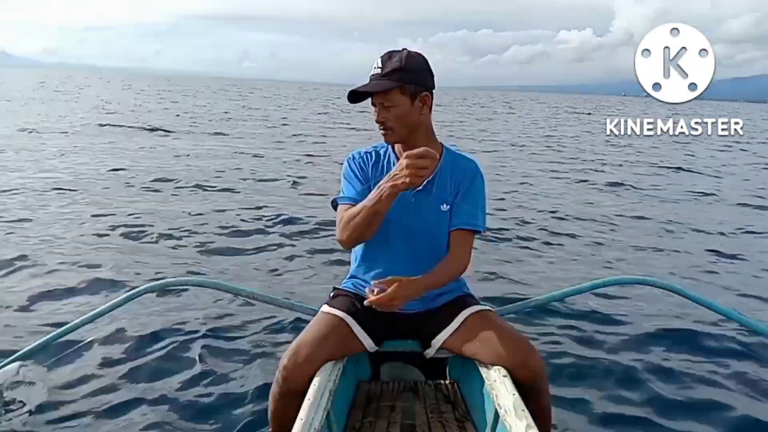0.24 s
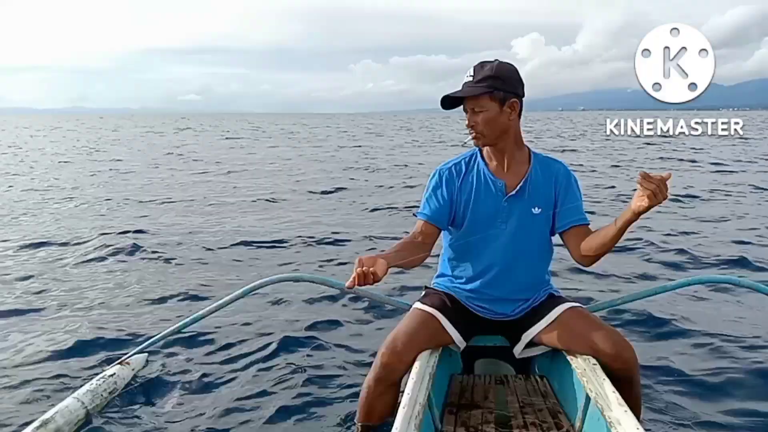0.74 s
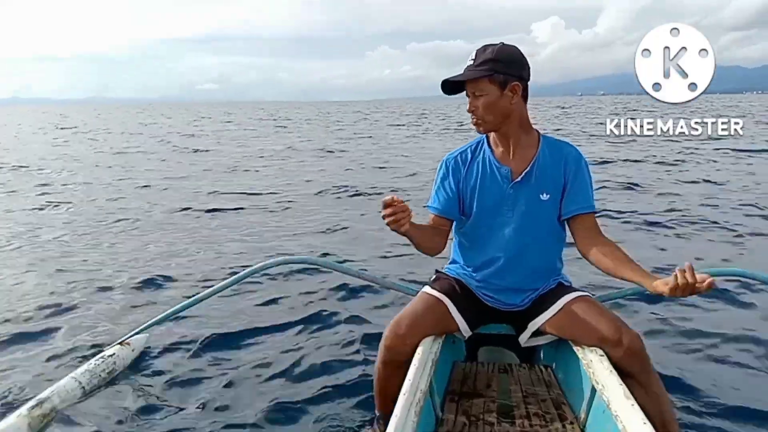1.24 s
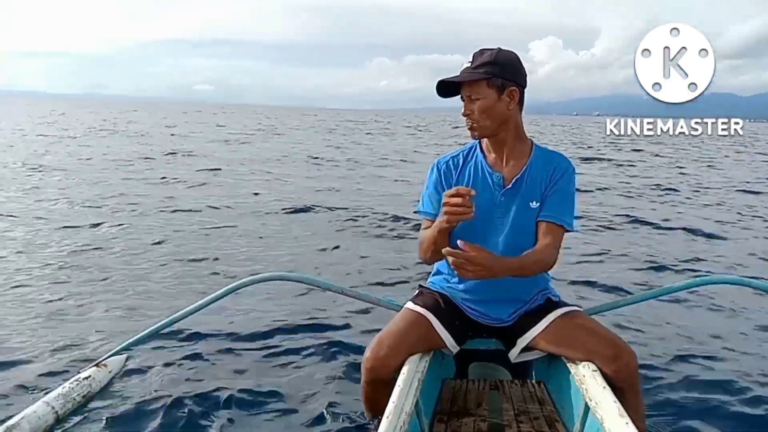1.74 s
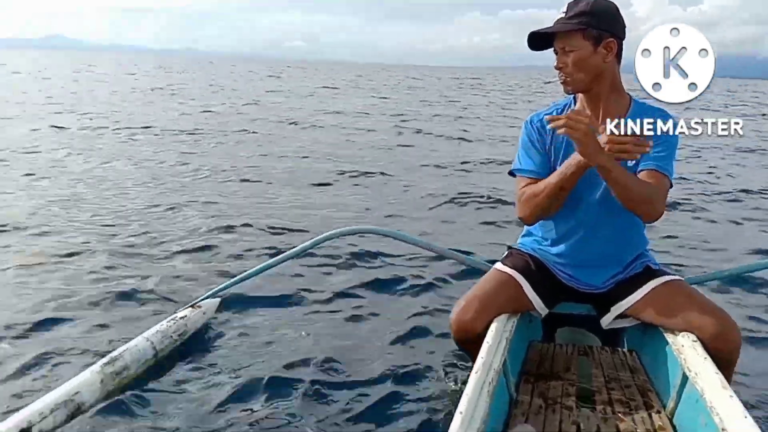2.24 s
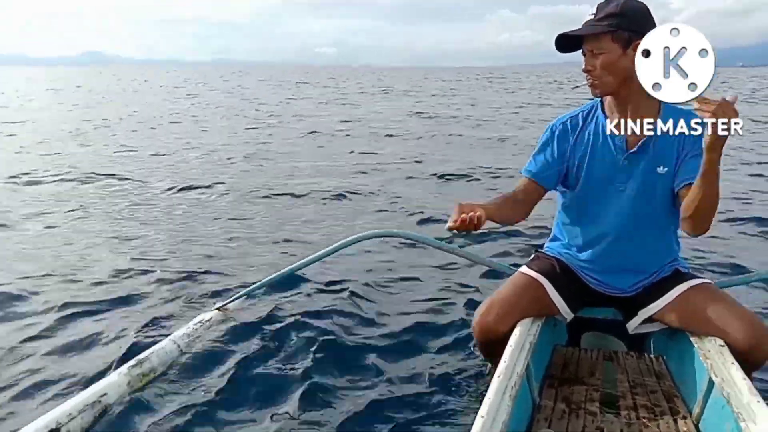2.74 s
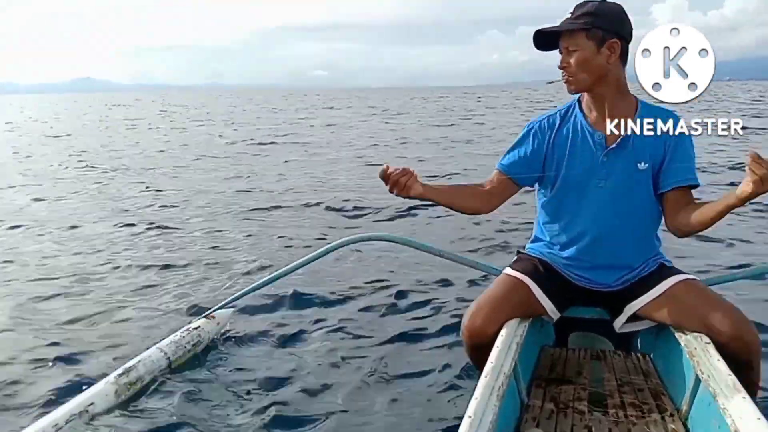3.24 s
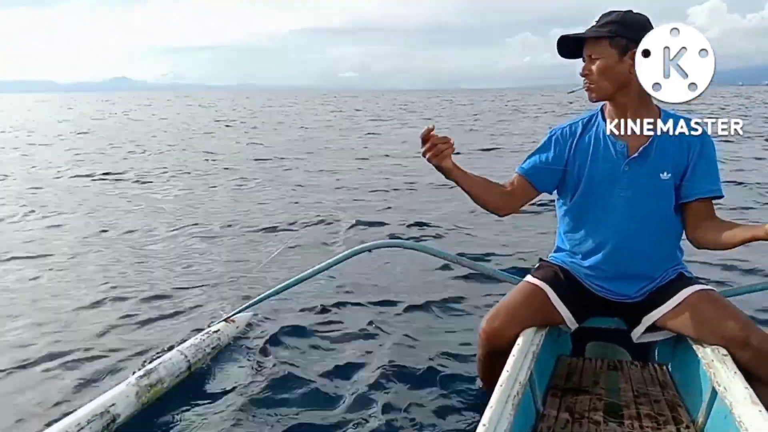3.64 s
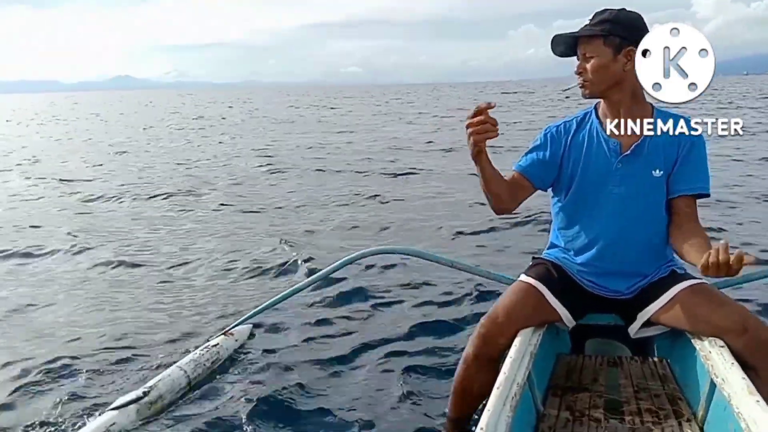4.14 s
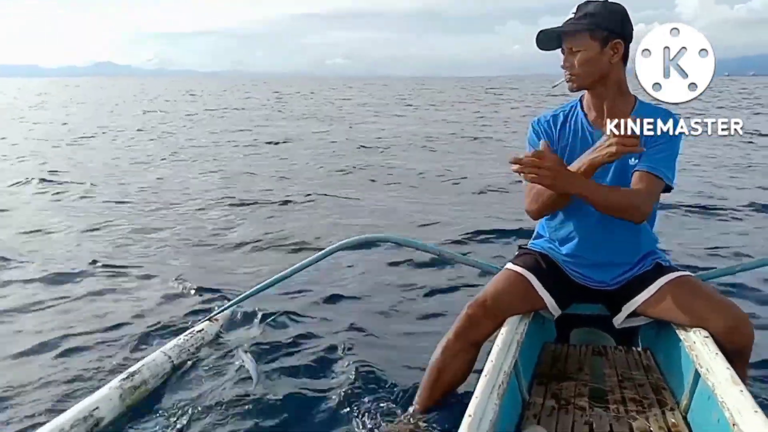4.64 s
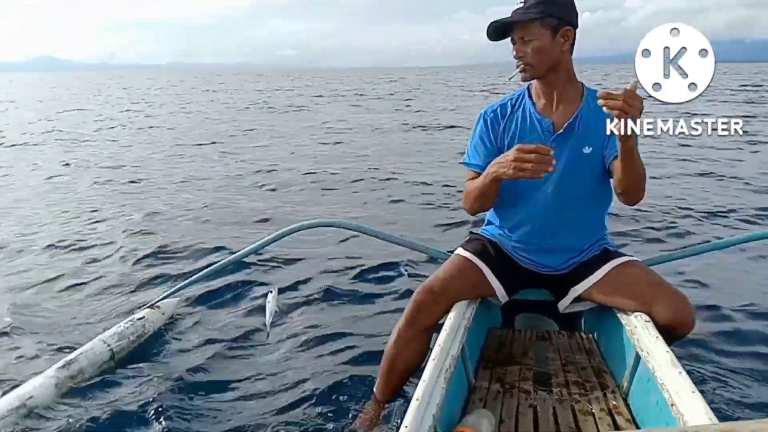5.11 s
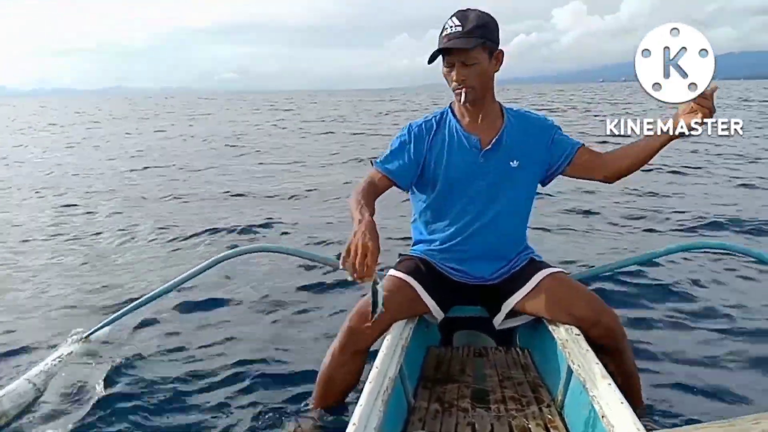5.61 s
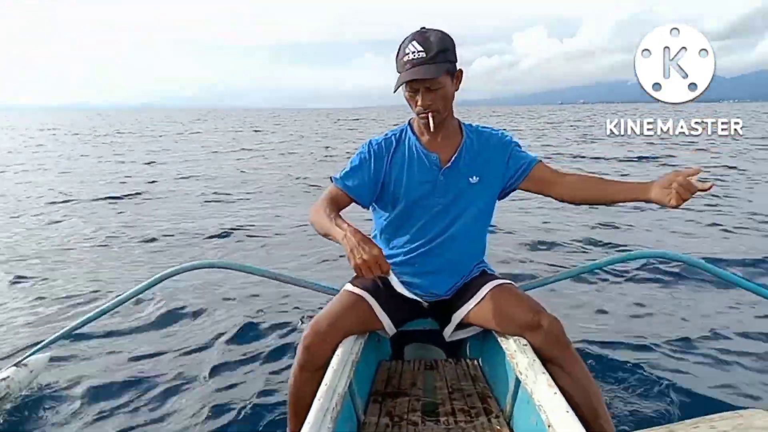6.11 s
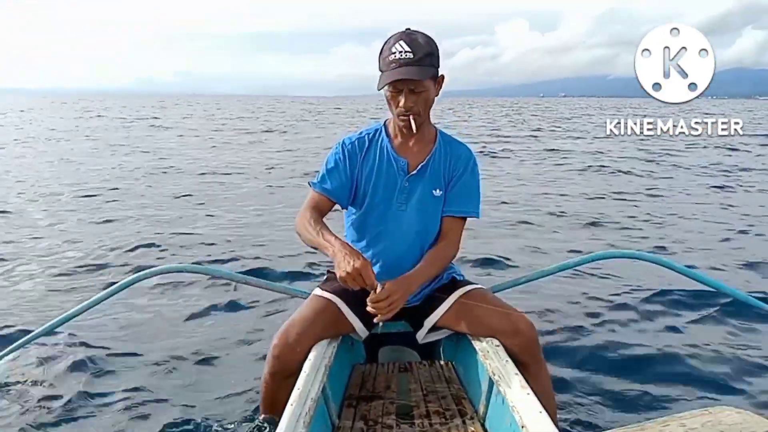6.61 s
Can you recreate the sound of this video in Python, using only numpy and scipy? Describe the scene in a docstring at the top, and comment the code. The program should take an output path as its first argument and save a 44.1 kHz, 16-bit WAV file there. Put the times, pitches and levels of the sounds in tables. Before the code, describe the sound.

Close to the water on a small wooden boat in open sea, sparse drips and faint lapping come first. A sharp little slap lands after one second, then gulping bubbles and slaps after two. Drops tick on through a calmer middle; gurgling returns around four and a half seconds, and the loudest slap and fizzing splash come after six. Low wind buffets the microphone over faint hiss.

```python
"""Small waves lap against the hull and float of a wooden boat at sea: slaps of shaped noise and a watery gurgle.
Trapped air gulps and rings as bubbles, each a short sine gliding in pitch.
Drops tick and ring; spray fizzes from crowds of tiny bubbles and crackling noise as each wave breaks.
Behind them, low lumpy noise is wind rumbling on the microphone, over a faint steady background hiss."""
import sys
import numpy as np
from scipy import signal
from scipy.fft import rfft, irfft
from scipy.io import wavfile

SR = 44100
rng = np.random.default_rng(int(sys.argv[2]) if len(sys.argv) > 2 else 0)


def log_audio(samples):
    """Write samples as a 16-bit WAV file to the path given in sys.argv[1]."""
    # one column per channel
    frames = np.atleast_2d(samples).T
    # limit to full scale, then quantise
    limited = np.clip(frames, -1, 1)
    pcm = np.round(limited * 32767).astype(np.int16)
    wavfile.write(sys.argv[1], SR, pcm)


N = 302526   # length in samples


def from_db(db):
    """Turn a level in dB into a gain."""
    return 10 ** (np.asarray(db) / 20)


def rms_one(x):
    """Scale a sound to an average strength (rms) of 1."""
    return x / np.sqrt(np.mean(x ** 2) + 1e-20)


def band(x, order, hz, kind="low"):
    """Filter a sound to the part below, above or between the given frequencies."""
    return signal.sosfilt(signal.butter(order, hz, kind, fs=SR, output="sos"), x)


def drift(rate_hz):
    """Slow random wandering: noise through two equal one-pole low-passes; rms 1."""
    r = np.exp(-2 * np.pi * rate_hz / SR)
    noise = rng.standard_normal(N + SR)
    # the first second lets the filter settle
    return rms_one(signal.lfilter([1], [1, -2 * r, r * r], noise)[SR:])


def colour(x, spectrum):
    """Shape flat sound by a (Hz, dB) curve, minimum phase so that nothing sounds early; rms 1."""
    size = 8192
    hz = np.maximum(np.fft.rfftfreq(size, 1 / SR), 1)
    points = np.array(spectrum)
    curve_db = np.interp(np.log(hz), np.log(points[:, 0]), points[:, 1])
    # folding the cepstrum onto positive times gives minimum phase
    cepstrum = irfft(np.log(from_db(curve_db)))
    cepstrum[1:size // 2] *= 2
    cepstrum[size // 2 + 1:] = 0
    response = irfft(np.exp(rfft(cepstrum)))
    return rms_one(signal.fftconvolve(x, response)[:N])


def in_time(rows):
    """Join the rows of a table with straight lines, giving each column at every sample."""
    s, *columns = np.transpose(rows)
    return [np.interp(np.arange(N) / SR, s, column) for column in columns]


def with_swells(base_db, times, peaks_db, rises_ms, falls_ms):
    """A level in dB with swells added in power; each climbs and falls 20 dB in its rise and fall time."""
    power = from_db(2 * (base_db + np.zeros(N)))
    for s, peak_db, rise_ms, fall_ms in zip(times, peaks_db, rises_ms, falls_ms):
        late_ms = 1000 * (np.arange(N) / SR - s)
        swell_db = peak_db - 20 * np.maximum(-late_ms / rise_ms, late_ms / fall_ms)
        power = power + from_db(2 * swell_db)
    return 10 * np.log10(power)


def bursts(times, peaks_db, decays_ms, rise_ms):
    """Envelope of sudden bursts that die away exponentially."""
    out = np.zeros(N + SR)
    for s, peak_db, decay_ms in zip(times, peaks_db, decays_ms):
        age_ms = np.arange(int(6 * decay_ms * SR / 1000)) * 1000 / SR
        at = int(s * SR)
        shape = np.exp(-age_ms / decay_ms) * (1 - np.exp(-age_ms / rise_ms))
        out[at:at + len(age_ms)] += from_db(peak_db) * shape
    return out[:N]


def bubbles(rows, rise, wobble_db, waver, sag=1.6):
    """Each bubble starts fast, rings as a gliding sine, sags and pinches off; level and pitch are unsteady."""
    out = np.zeros(N + SR)
    unsteady = 2 ** (waver * np.resize(drift(45.5), N + SR))   # waver is in octaves
    for s, start_hz, end_hz, level_db, glide_ms in rows:
        at = int(s * SR)
        # the sine lasts 1.3 times the glide time, gliding on past the end pitch
        length = 1.3 * glide_ms * SR / 1000
        age = np.arange(int(length)) / length   # 0 at birth, 1 at the end
        hz = start_hz * (end_hz / start_hz) ** (1.3 * age) * unsteady[at:at + len(age)]
        shape = (1 - np.exp(-age / rise)) * np.exp(-sag * age) * (1 - age ** 3)
        out[at:at + len(age)] += from_db(level_db) * shape * np.sin(2 * np.pi * np.cumsum(hz) / SR)
    return out[:N] * from_db(wobble_db * drift(126))


def crowd(per_s, low_hz, octaves, cycles, spread_db, bunch_db):
    """Small bubbles born at random, louder in bunches, each ringing some cycles and gliding a little; rms 1."""
    born, pitch, glide, size, ringing = rng.random((int(per_s * N / SR), 5)).T
    hz = low_hz * 2 ** (octaves * pitch)
    end_hz = hz * 2 ** (.17 * glide - .06)
    bunches_db = bunch_db * drift(14)[(born * N).astype(int)]
    level_db = -spread_db * np.log(size + 0.025) + bunches_db   # few are much louder than the rest
    glide_ms = 1000 * cycles * (0.76 + ringing) / hz
    rows = np.transpose([born * N / SR, hz, end_hz, level_db, glide_ms])
    return rms_one(bubbles(rows, rise=0.04, wobble_db=2.0, waver=0.012, sag=2.2))


def crackle(per_s, clump_db, mist_db):
    """The tiniest bubbles burst in clumps as short ticks of uneven size, over a mist of noise; rms 1."""
    clump = drift(29)
    born = rng.random(N) < per_s * from_db(clump_db * clump) / SR
    ticks = born * from_db(5.0 * np.minimum(rng.exponential(1, N), 3.0))
    # each tick becomes a very short decaying burst of noise
    ticks = signal.lfilter([1], [1, -.95], ticks) * rng.standard_normal(N)
    mist = from_db(mist_db + clump_db * clump) * rng.standard_normal(N)
    return rms_one(rms_one(ticks) + mist)


def hiss():
    """A faint steady background hiss: noise shaped by a curve."""
    # Tone of the background hiss. Each row: frequency in Hz, relative strength in dB.
    hiss_curve = [(150, -40), (250, -6.5), (3530, -7), (5260, -25.5), (7950, -12.5), (9700, -26),
                  (12600, -34), (21300, -120)]
    return from_db(-73) * colour(rng.standard_normal(N), hiss_curve)


def wind():
    """Eddies buffet the microphone port: lumpy low noise that swells in gusts, its deepest part cut."""
    # Gusts. Each row: peak time in seconds, level added at the peak in dB, time to climb 20 dB in ms.
    gust_rows = [(0.12, -55, 67), (0.62, -57.5, 130), (1.2, -50.5, 140), (1.409, -40.5, 78),
                 (2.31, -46, 60), (2.569, -40.5, 43), (2.66, -46.5, 56), (3.97, -42.5, 153),
                 (4.36, -49, 160), (4.48, -43.5, 49), (4.8, -50.5, 220), (5.84, -44.5, 200),
                 (6.0, -46.5, 240), (6.27, -41, 190), (6.43, -35, 123), (6.69, -36.5, 92)]
    # Tone of the rumble before the cut. Each row: frequency in Hz, relative strength in dB.
    wind_curve = [(12, -53), (45, -1.5), (100, 2), (150, -1.5), (220, -7.5), (300, -14.5), (390, -30),
                  (660, -120)]
    lull_db, fade_ratio = -64.5, 1.12   # level between gusts; fade time against build-up
    s, peak_db, build_ms = np.transpose(gust_rows)
    wind_db = with_swells(lull_db, s, peak_db, build_ms, fade_ratio * build_ms)
    eddies = colour(rng.standard_normal(N) * from_db(2.2 * drift(9)), wind_curve)
    return from_db(wind_db) * band(eddies, 4, 58., "high")


def spray(spray_db, fizz_db):
    """Plinks and some crackle in the middle range, patchy while faint; finer fizz above, uneven throughout."""
    # Tone of the spray before it is split in two. Each row: frequency in Hz, relative strength in dB.
    spray_curve = [(530, -11), (900, -5.5), (1110, -2), (1540, -5), (1960, 2), (2230, -4.5), (3100, -2),
                   (3900, -2), (4980, -13.5), (8270, -9), (9700, -23.5), (12600, -43), (21300, -120)]
    # Splashes that build up and break off. Each row: peak time in seconds, spray level added at the
    # peak in dB, fizz level against the spray in dB, time to climb 20 dB in ms.
    splash_rows = [(0.213, -41.5, -8.5, 33), (1.195, -47.5, -7.5, 190), (1.62, -79.5, 22, 95),
                   (2.311, -54, 6, 53), (2.659, -54.5, 1.5, 14), (3.684, -46, -9, 26),
                   (4.689, -43.5, -7, 58), (5.946, -41, -4.5, 81), (6.14, -43.5, -6.5, 41),
                   (6.364, -35, -1.5, 26)]
    s, peak_db, brighter_db, build_ms = np.transpose(splash_rows)
    break_ms = np.full(len(s), 32)   # time to fall 20 dB
    spray_db = with_swells(spray_db, s, peak_db, build_ms, break_ms)
    fizz_db = with_swells(fizz_db, s, peak_db + brighter_db, build_ms, break_ms)

    plinks = crowd(per_s=850., low_hz=800., octaves=2.6, cycles=25., spread_db=2.9, bunch_db=2.0)
    plinks = rms_one(np.gradient(plinks))   # small bubbles radiate better
    fine = crackle(per_s=240.0, clump_db=3.5, mist_db=-1.5)
    pricks = crowd(per_s=200., low_hz=4800., octaves=1.1, cycles=14., spread_db=3.8, bunch_db=3.)

    # the middle is uneven while faint, evening out into a steady rush towards -40.5 dB
    faint = np.clip((-40.5 - spray_db) / 20, 0, 1)
    patches_db = 4.0 * faint * drift(5.5)
    rush = (1 - faint) ** 2   # share of plain rushing noise in the middle range
    grains = rms_one(plinks + from_db(-3.0) * fine)
    wash = (grains + rush * rng.standard_normal(N)) / np.sqrt(1 + rush ** 2)
    middle = rms_one(band(colour(wash, spray_curve), 4, 4700))

    fizz = rms_one(band(colour(from_db(-4.5) * pricks + fine, spray_curve), 4, 4700, "high"))
    lower = signal.sosfiltfilt(signal.butter(2, 6800, fs=SR, output="sos"), fizz)
    # the lower and upper fizz come and go separately
    fizz = sum(from_db(4.0 * drift(11.3)) * part for part in (lower, fizz - lower))
    return from_db(spray_db + patches_db) * middle + from_db(fizz_db) * fizz


def drops():
    """A drop hits water or wood: a sharp bright tick, and a body with a brief ring and a ping an octave up."""
    # Drops. Each row: start in seconds, treble level in dB before the mix, body level against treble in dB.
    drop_rows = [(0.0846, -30, -5), (0.636, -38, -10), (0.8397, -35.5, 6), (1.1778, -36.5, 4),
                 (1.8296, -31, -25), (1.886, -45, 9), (2.0351, -51, 22), (2.065, -46.5, 21.5),
                 (2.078, -30, -3), (2.261, -32, -5), (2.291, -36, 4), (2.123, -45.5, 16.5),
                 (2.7303, -33.5, 5.5), (2.781, -38, 5), (2.8242, -28, -16), (2.911, -41, 18),
                 (3.06, -46, 17.5), (3.243, -36, -12), (3.3335, -30.5, 3.5), (3.4276, -29, -23),
                 (3.6345, -40, -23), (3.734, -53, 0), (3.835, -38, -4), (3.892, -37, 0.5),
                 (3.93, -35.5, -10), (4.2064, -42, 12), (4.4039, -43.5, 21.5), (4.675, -26, 2),
                 (4.8462, -29, -1), (4.9, -34, 10), (5.0603, -26.5, -29), (5.316, -25.5, -12),
                 (5.3462, -26.5, 6.5), (5.399, -24.5, -2), (5.4643, -32.5, 13), (5.526, -50, 31),
                 (5.5672, -34, 18), (5.8292, -30, 2), (5.877, -40.5, 17.5), (5.9138, -47, 22.5),
                 (6.298, -33, -5), (6.354, -20.5, 10), (6.375, -19, 6), (6.4798, -28.5, 13),
                 (6.489, -29, 13), (6.586, -24, -4), (6.725, -19, -10), (6.739, -25, -15), (6.775, -21, -9),
                 (6.6492, -16, -12), (6.7616, -13, -14), (6.824, -24, -4)]
    # Lowest and highest pitch a drop's ring may have, in Hz, before it wavers.
    ring_range = (3260, 4216)
    s, peak_db, body_db = np.transpose(drop_rows)
    each = np.ones(len(s))
    hz = rng.uniform(*ring_range, len(s))
    ring_ms = 2.83 * each
    ring_rows = np.transpose([s, hz, hz, peak_db + body_db, ring_ms])
    ring = bubbles(ring_rows, rise=0.31, wobble_db=2.0, waver=0.025)
    ping_rows = np.transpose([s, 2 * hz, 2 * hz, peak_db, ring_ms])
    ping = bubbles(ping_rows, rise=.1, wobble_db=4.0, waver=.06)
    treble = bursts(s, peak_db, 3.14 * each, rise_ms=.3) * rng.standard_normal(N)
    body = bursts(s, peak_db + body_db, 5.6 * each, rise_ms=0.43) * rng.standard_normal(N)
    bright = band(treble, 5, [5200, 8700], "band")
    splat = band(body, 2, [2800, 4500], "band")
    return from_db(-10.0) * ping + from_db(-4.5) * bright + from_db(-6.0) * splat + from_db(-1.0) * ring


def clear_bubbles():
    """Trapped air gulps and rings as single clear bubbles, each a gliding sine."""
    # Bubbles and gulps, before their wavering. Each row: start in seconds, start pitch in Hz,
    # end pitch in Hz, level in dB before the fade shape, time to reach the end pitch in ms.
    bubble_rows = [(0.158, 900, 770, -47, 16), (0.189, 2600, 2610, -21.5, 3.5), (0.425, 620, 706, -51, 40),
                   (0.731, 476, 503, -42.5, 37), (1.062, 1210, 1290, -44, 10),
                   (1.174, 743, 550, -37.5, 40.5), (1.189, 2540, 2680, -21, 13.6),
                   (1.942, 734, 627, -32.5, 67), (1.981, 2170, 2500, -27.5, 5.8),
                   (2.02, 462, 396, -33.5, 70), (2.022, 676, 783, -29.5, 55),
                   (2.079, 307.6, 376, -38.5, 139), (2.165, 1730, 1740, -39, 24),
                   (2.377, 427, 312, -28, 19), (2.382, 774, 867, -26, 35), (2.495, 1230, 1370, -41.5, 11),
                   (2.583, 1090, 1110, -42, 30), (2.593, 2720, 2600, -32, 6.9), (2.774, 470, 440, -44, 54),
                   (2.899, 270, 480, -41, 62), (2.945, 630, 834, -42, 27), (2.977, 740, 800, -29.5, 16),
                   (3.036, 659, 640, -47, 50), (3.202, 679, 564, -44.5, 75), (3.493, 662, 710, -50, 39),
                   (3.529, 2300, 2310, -35, 8.8), (3.675, 2020, 1960, -36, 15),
                   (3.677, 1206, 1060, -31, 9.9), (4.055, 751, 1127, -37, 43),
                   (4.088, 1170, 2510, -47.5, 41), (4.165, 765, 780, -54.5, 66),
                   (4.312, 508, 487, -42.5, 33), (4.327, 211, 240, -36, 62), (4.433, 468, 406, -34.5, 42),
                   (4.476, 402, 309, -36.5, 93), (4.482, 756, 722, -29, 45),
                   (4.499, 1910, 1870, -29.5, 9.8), (4.832, 568, 560, -39, 36),
                   (4.939, 2750, 2800, -29, 5.7), (4.97, 817, 830, -39, 20), (4.978, 318, 436, -41, 64),
                   (5.004, 930, 990, -29.5, 21), (5.06, 840, 875, -40, 8.5), (5.11, 1080, 1080, -36.5, 17),
                   (5.118, 1027, 1200, -30.5, 28), (5.143, 415, 460, -43, 77), (5.37, 246, 236, -42.5, 72),
                   (5.42, 458, 490, -37.5, 32), (5.488, 356, 510, -31, 53), (5.522, 610, 765, -32, 15),
                   (5.923, 714, 565, -29.5, 16.4), (5.937, 228, 330, -33, 62), (6.105, 710, 735, -37.5, 20),
                   (6.231, 395, 360, -32.5, 60), (6.297, 297, 402, -27.5, 69),
                   (6.305, 1050, 980, -21.5, 16.4), (6.323, 583, 786, -17.5, 15.4),
                   (6.355, 1860, 1900, -25, 13.5), (6.41, 543, 735, -28, 16.7),
                   (6.634, 306, 344, -24.5, 35), (6.692, 1910, 2070, -10.5, 5.2),
                   (6.741, 1930, 1950, -25, 3.8), (6.761, 2000, 1980, -19, 2.9),
                   (6.817, 1970, 2000, -27, 7.6), (6.826, 2560, 2670, -20, 8.8)]
    return bubbles(bubble_rows, rise=.07, wobble_db=4.5, waver=.04, sag=1.9)


def gurgle(gurgle_db):
    """Larger bubbles over sloshing noise; the deepest are faint."""
    larger = crowd(per_s=240., low_hz=270., octaves=2.3, cycles=20., spread_db=3.0, bunch_db=2.5)
    slosh = rms_one(band(rng.standard_normal(N), 3, 1500))
    both = larger + from_db(-12.5) * slosh
    return from_db(gurgle_db) * rms_one(band(both, 1, [400, 1300], "band"))


def slaps():
    """A wave face strikes the planks: a broad, lumpy burst."""
    # Waves striking the hull. Each row: start in seconds, level in dB before the 8 dB cut, decay time in ms.
    slap_rows = [(0.188, -45, 6.7), (1.173, -28.5, 16.5), (2.022, -39.5, 47), (2.378, -31.5, 13),
                 (2.494, -37.5, 23.4), (2.581, -25, 7.3), (3.677, -53, 7), (4.313, -49, 61),
                 (4.444, -33, 12), (5.006, -46, 8.1), (5.926, -32.5, 42), (6.085, -34, 12),
                 (6.297, -23.5, 6.2), (6.322, -22, 22), (6.69, -19, 24)]
    # Tone of a slap. Each row: frequency in Hz, relative strength in dB.
    slap_curve = [(200, -10.5), (400, -8.5), (1000, 2.5), (1500, -9), (2500, -0.5), (4200, -3.5),
                  (5000, -22), (8500, -13.5), (11000, -45)]
    noise = colour(rng.standard_normal(N), slap_curve) * from_db(5.18 * drift(160))
    # noise peaks stand well above its rms, hence the cut
    return bursts(*np.transpose(slap_rows), rise_ms=2.1) * noise * from_db(-8.0)


def scene():
    """Water close by, wind, and a faint steady background hiss."""
    # The wash along the hull, rising at once as a wave arrives and draining slowly.
    # Each row: time in seconds, gurgle level in dB, then spray and fizz levels in dB
    # before splashes and patchiness.
    wash_rows = [(0.0, -71.5, -55, -71), (0.55, -73, -64.5, -78), (0.8, -65.5, -49.5, -66.5),
                 (1.1, -66, -65.5, -77), (1.24, -70, -69.5, -71.5), (1.86, -67.5, -70, -71.5),
                 (1.92, -71, -50.5, -67.5), (2.1, -53, -50, -54), (2.54, -67.5, -55.5, -67),
                 (2.715, -72, -81, -85), (2.735, -63, -56, -63), (2.98, -68.5, -55, -61.5),
                 (3.72, -69.5, -68, -80), (4.36, -73, -72.5, -82), (4.41, -46, -50.5, -58),
                 (5.52, -49.5, -51, -59.5), (5.78, -56, -56.5, -69.5), (6.27, -56, -49, -64.5),
                 (6.33, -38.5, -39, -49), (6.86, -42.5, -31.5, -43.5)]
    gurgle_db, spray_db, fizz_db = in_time(wash_rows)
    water = spray(spray_db, fizz_db) + drops() + clear_bubbles() + gurgle(gurgle_db) + slaps()
    return (hiss() + wind() + water)[None]


def record(dry):
    """The top is cut: a steep low-pass, 70 dB down from 15500 Hz up."""
    return signal.sosfilt(signal.cheby2(12, 70, 15500, fs=SR, output="sos"), dry)


dry = scene()
out = record(dry)
log_audio(out)
```